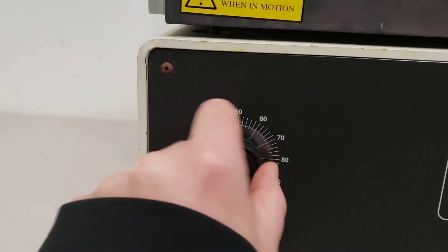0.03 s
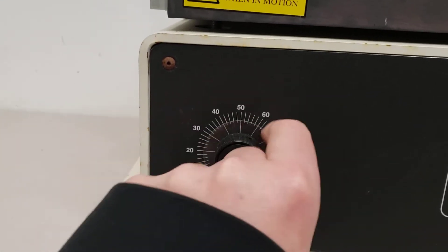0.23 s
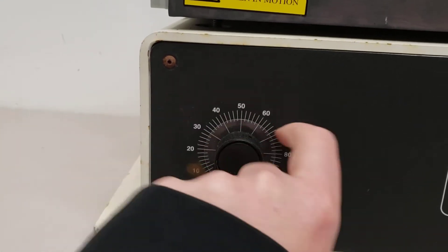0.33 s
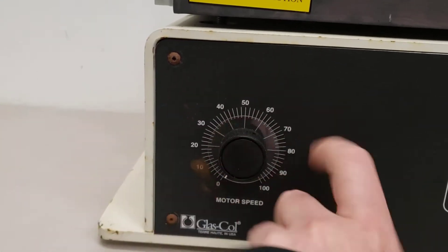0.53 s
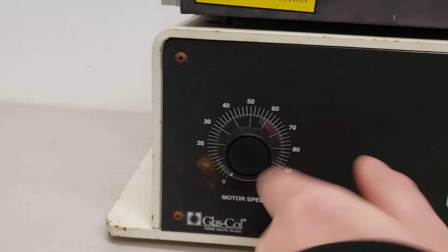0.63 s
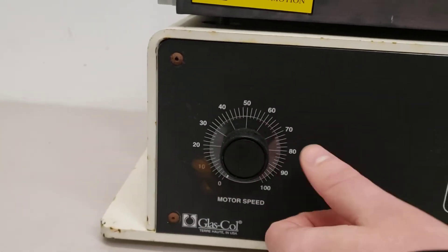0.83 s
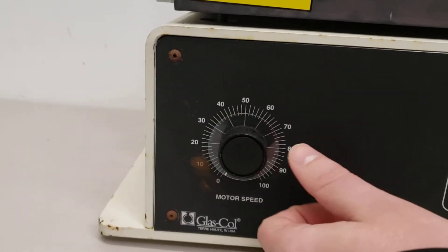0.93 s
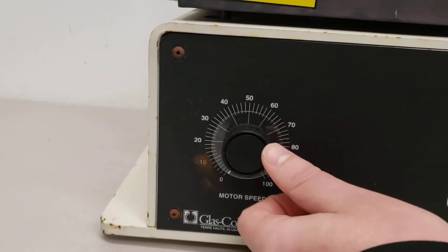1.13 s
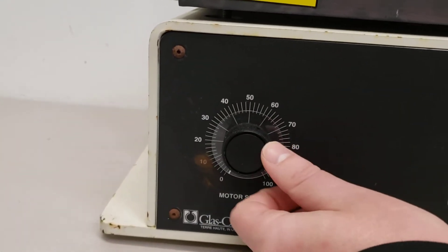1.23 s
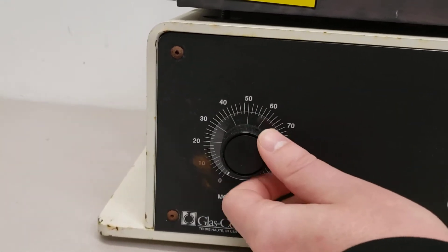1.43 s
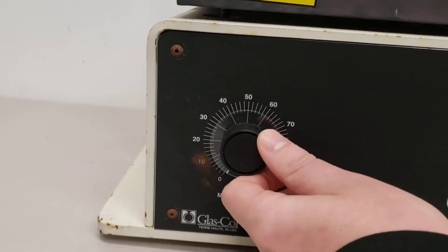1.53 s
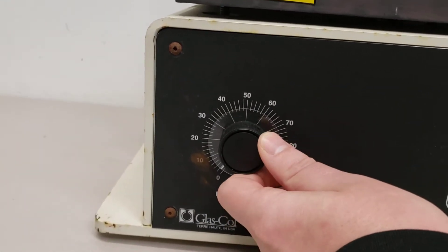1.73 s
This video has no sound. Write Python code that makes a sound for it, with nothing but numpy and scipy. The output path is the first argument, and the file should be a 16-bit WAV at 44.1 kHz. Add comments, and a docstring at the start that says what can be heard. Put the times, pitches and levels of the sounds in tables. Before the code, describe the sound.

A double thump rings and rattles a bench, just after a plastic knob ticks and a hand softly knocks a steel machine case. A sleeve swishes past and a faint whirr fades, close up in a quiet room.

```python
"""A knob ticks and a steel case booms softly: a hand lets go of the speed dial of a laboratory shaker,
close to the microphone in a quiet room. A double thump with a hard first contact rings the bench and
rattles what stands on it. Then a sleeve swishes by, cloth rubbing on cloth, and a narrow whirr fades
as the fingers settle on the dial again. Soft handling bumps and rumble lie underneath."""
import sys
import numpy as np
from scipy.fft import rfft, irfft, next_fast_len
from scipy.io import wavfile
from scipy.ndimage import map_coordinates

SR = 44100
rng = np.random.default_rng(int(sys.argv[2]) if len(sys.argv) > 2 else 0)


def materialize(psi):
    """Save the field psi as 16-bit PCM at rate SR to the path in sys.argv[1].

    A 1-D psi becomes a single channel; in a 2-D psi each row is a channel.
    """
    bounded = np.clip(np.atleast_2d(psi).T, -1, 1)
    quanta = np.round(bounded * 32767).astype(np.int16)
    wavfile.write(sys.argv[1], SR, quanta)


N = 79380

# blows on the bench, close by (time [s], level [dB], contact time [ms])
BLOWS = [(0.5774, -39, 0.1), (.592, -36, .85), (.6138, -44, .9)]
# modes of the bench under the shaker (frequency [Hz], level [dB], t60 [s])
BENCH_MODES = [(69.35, -13, 0.96), (98, 0.5, 0.16), (177.8, -3.5, 0.3), (236.3, -4.5, 0.31),
               (293.5, -2.5, 0.36), (361.4, -4, 0.28), (412.5, -2, .15), (554, 0, 0.19), (623, -1.5, 0.21),
               (719.8, -3.5, 0.24), (850, -4, 0.3), (978, -6.5, 0.22), (1198, 4, 0.09), (1262, 4.5, 0.075)]
# spectra of the dense clatter and of the hard first contact (frequency [Hz], level [dB])
CLATTER_COLOUR = [(60, -7), (1200, 1.5), (3000, -12.5), (15000, -39)]
CONTACT_COLOUR = [(300, -15), (1250, 2), (1700, -8), (2100, 0), (3000, -11), (4600, 2), (5500, -9),
                  (15000, -31)]
# where the thump sits at the microphone (frequency [Hz], left over right [dB])
THUMP_BALANCE = [(250, 2), (600, 0), (1300, 8.5), (4000, -3)]

def thump():
    """A hard blow, a softer, heavier one and its rebound ring the bench and rattle what stands on it."""
    out = amp(-36.5) * decay(BLOWS[0][0], t60=0.028) * noise(CONTACT_COLOUR) * pan(db=-2.0)
    for s, db, ms in BLOWS:
        clatter = filtered(noise(CLATTER_COLOUR), lambda hz: softness(hz, ms)) * decay(s, t60=0.18)
        bench = ring(BENCH_MODES, s, ms, spread=0.34, rough=0.42)
        out += amp(db) * (bench + amp(2.5) * clatter)
    return filtered(out, lambda hz: pan(along(THUMP_BALANCE, hz)))


# the hand on the case (time [s], level [dB], contact time [ms], ring time factor [ratio])
HAND_KNOCKS = [(.001, -59, 1.4, 0.79), (0.193, -42, 0.67, 1.02), (0.3463, -40, 1.14, 0.97),
               (1.301, -53.5, .3, 0.58), (1.388, -55, 1.7, 0.33)]
# modes of the steel case (frequency [Hz], level [dB], t60 before that factor [s])
CASE_MODES = [(63.5, -5.5, 0.74), (103.1, -11.5, 0.59), (220.7, 1, 0.4), (291.7, -7, 0.3),
              (388, -16.5, 0.19), (607, -14.5, .14), (731, -9, 0.092), (1240, -18, 0.06)]

def case():
    """The hand knocks the steel case as it leaves the dial and returns; resting fingers damp the ring."""
    out = np.zeros((2, N))
    for s, db, ms, factor in HAND_KNOCKS:
        modes = [(hz, mode_db, t60 * factor) for hz, mode_db, t60 in CASE_MODES]
        out += amp(db) * ring(modes, s, ms, spread=0.38, rough=0.46)
    return out


# ticks of the knob, right of the microphone (time [s], level [dB])
KNOB_TICKS = [(0.065, -42), (0.0657, -44.5), (.192, -37.5)]
# fingers scuffing off the dial (time [s], level [dB], rise [s], fall [s])
FINGER_SCUFFS = [(0.345, -56.5, 0.00067, 0.014), (.42, -50.5, 0.0045, 0.0079), (0.423, -59, 0.026, 0.041)]
# spectra of a tick and of a scuff at close range (frequency [Hz], level [dB])
PLASTIC_COLOUR = [(500, -16), (3900, -8), (4700, 11), (5700, -4), (8300, 2), (11200, -8.5), (13900, 11),
                  (15800, 0)]
FINGER_COLOUR = [(300, -12), (1400, -4), (2800, -12), (5200, -4), (6700, -17.5), (15000, -26.5)]
# resonances of the panel under a scuff (frequency [Hz], lift [dB])
PANEL_MODES = [(958, 15), (1440, 12), (2170, 13), (4080, 7), (5400, 12.5)]

def knob(width_hz=47):
    """Dry plastic ticks with a faint tail, and the fingers scuffing off, which rings the panel."""
    def panel(hz):
        return 1 + sum((amp(db) - 1) / (1 + (2 * (hz - centre) / width_hz) ** 2)
                       for centre, db in PANEL_MODES)
    tick_level = sum(amp(db) * (decay(s, t60=0.0096, attack=0.0001) + amp(-22.5) * decay(s, t60=0.17))
                     for s, db in KNOB_TICKS)
    ticks = tick_level * noise(PLASTIC_COLOUR) * pan(db=-12)
    scuffs = sum(swell(*row) for row in FINGER_SCUFFS) * unit(filtered(noise(FINGER_COLOUR), panel))
    return ticks + scuffs


# slow rubs of the sleeve, near the microphone (time [s], level [dB], rise [s], fall [s])
SLOW_RUBS = [(0.039, -60, 0.088, 0.038), (.39, -62, 0.03, 0.097), (0.663, -46, 0.073, 0.046),
             (1.16, -68, 0.2, .14), (1.46, -76.5, .06, 0.064), (1.78, -78, .04, .04)]
# spectra of the slow rubs and of the fast sweep (frequency [Hz], level [dB])
SLOW_COLOUR = [(200, -7), (2200, -12), (4600, -0.5), (7000, -8), (8200, -21.5), (11000, -14)]
FAST_COLOUR = [(100, -9), (330, 2), (550, -1.5), (950, 6.5), (1500, -1), (4900, 0), (7000, -5.5),
               (8200, -11.5), (11000, -7), (11900, -2.5), (13000, -6)]
# where the cloth sits at the microphone (frequency [Hz], left over right [dB])
CLOTH_BALANCE = [(200, -3.5), (1200, 7), (2400, 2.5), (4400, -11), (12000, -7.5), (15000, 1)]

def sleeve(peak_s=0.72, sweep_db=-42, rise_s=0.0839, fade_db_per_s=44):
    """Grainy cloth friction: dull in slow rubs, broad and bright in the fast sweep, which trails off."""
    sweep = swell(peak_s, sweep_db, rise_s, fall=0.1636)
    trail = swell(peak_s, sweep_db - 5.5, rise_s, fall=np.inf) * amp(-fade_db_per_s * since(peak_s))
    fast = np.hypot(sweep, trail) * noise(FAST_COLOUR)
    slow = sum(swell(*row) for row in SLOW_RUBS) * noise(SLOW_COLOUR)
    grain = amp(wobble(700) + 0.34 * wobble(50.3))
    return filtered((slow + fast) * grain, lambda hz: pan(along(CLOTH_BALANCE, hz)))


# soft bumps, mostly to the right (time [s], level [dB], pitch [Hz], left over right [dB])
LOW_BUMPS = [(.277, -34, 101, -24), (.344, -31.5, 206, 1.5), (0.847, -34.5, 85, -21), (1.095, -51, 78, -3)]
# swells of handling rumble (time [s], level [dB], rise [s], fall [s])
RUMBLE_SWELLS = [(.115, -59, 0.029, 0.026), (.24, -52, 0.035, 0.19), (.78, -51.5, 0.1, 0.1),
                 (1.25, -68.5, 0.18, 0.21), (1.775, -60.5, 0.033, 0.05)]
# spectrum of that rumble (frequency [Hz], level [dB])
HANDLING_COLOUR = [(20, -19), (45, -1.5), (115, -4), (450, -25.5), (1500, -50.5), (6000, -61)]

def bumps(rise_cycles=0.42):
    """Soft handling bumps of a cycle or two over a low rumble."""
    out = sum(swell(*row) for row in RUMBLE_SWELLS) * noise(HANDLING_COLOUR)
    for s, db, hz, side in LOW_BUMPS:
        cycles = hz * since(s)
        age = cycles / rise_cycles
        out -= amp(db) * pan(side) * age * np.exp(1 - age) * np.sin(2 * np.pi * cycles)
    return out


# surges of the whirr, just left of centre (time [s], level [dB], rise and fall [s])
WHIRR_SURGES = [(.97, -58, .055), (1.072, -56, .024), (1.174, -56.5, 0.041), (1.285, -65.5, .042)]
# its spectrum, peaking near 900 Hz (frequency [Hz], level [dB])
WHIRR_BAND = [(300, -41), (700, -20), (905, 8.5), (1050, -4.5), (1270, -8), (1550, -34), (2080, -10.5),
              (2600, -53)]

def whirr():
    """A narrow, fluttering whirr that comes in surges and outlasts the swish."""
    surges = np.sqrt(sum(swell(s, db, width, width) ** 2 for s, db, width in WHIRR_SURGES))
    flutter = amp(0.94 * wobble(40.85))
    return surges * flutter * noise(WHIRR_BAND) * pan(db=2.5)


# room tone at the bench (frequency [Hz], level [dB])
ROOM_COLOUR = [(55, 3.5), (150, -11), (350, -5.5), (470, -17), (1900, -18.5), (5400, -23), (8200, -34),
               (12000, -18.5)]

def room_tone():
    """The steady, low hush of the quiet room."""
    return amp(-68.5) * noise(ROOM_COLOUR)


# likeness of left and right at the microphone (frequency [Hz], correlation [ratio])
STEREO_LIKENESS = [(50, 0.23), (130, 0.97), (800, 0.61), (1400, 0.086)]

def noise(colour):
    """Coloured stereo noise of rms 1, nearly mono around 130 Hz."""
    def mid_side(hz):
        angle = np.arccos(np.clip(along(STEREO_LIKENESS, hz), -1, 1)) / 2
        return amp(along(colour, hz)) * [np.cos(angle), np.sin(angle)]
    mid, side = filtered(rng.standard_normal((2, N)), mid_side)
    return unit(np.array([mid + side, mid - side]))


def ring(modes, s, contact_ms, spread, rough):
    """Struck modes: rough unsettles the phase; spread parts left from right, more so for high modes."""
    out = np.zeros((2, N))
    for hz, db, t60 in modes:
        skew = spread * np.sqrt(hz / 500) * rng.normal() * np.array([[1], [-1]])
        drift = wobble(45.03)
        phase = 2 * np.pi * hz * since(s) + skew + rough * (drift - drift[int(s * SR)])
        level = amp(db + rng.normal()) * softness(hz, contact_ms)
        out += level * decay(s, t60, attack=0.0016) * np.sin(phase)
    return out


def softness(hz, contact_ms):
    """A longer contact excites fewer high modes."""
    return 1 / np.sqrt(1 + (hz * contact_ms / 500) ** 4)


def decay(s, t60, attack=0.00016):
    """A quick rise at s, then a fall of 60 dB in t60 seconds."""
    t = since(s)
    return (1 - np.exp(-t / attack)) * np.exp(-np.log(1000) * t / t60)


def swell(s, db, rise, fall):
    """A bell-shaped stroke that peaks at s."""
    t = since(0) - s
    return amp(db) * np.exp(-.5 * (t / np.where(t < 0, rise, fall)) ** 2)


def wobble(rate):
    """A smooth random curve, rate knots a second."""
    return map_coordinates(rng.standard_normal(4000), [since(0) * rate + 2], mode="wrap")


def filtered(x, response):
    """x shaped by a frequency response."""
    size = next_fast_len(N + 8192)
    return irfft(rfft(x, size) * response(np.fft.rfftfreq(size, 1 / SR)), size)[..., :N]


def pan(db):
    """Left and right gains of constant power; positive is left."""
    gains = amp(np.array([[.5], [-.5]]) * db)
    return gains / np.sqrt(np.mean(gains ** 2, axis=0))


def along(points, hz):
    """Interpolate (frequency, value) points on a log axis."""
    freqs, values = np.transpose(points)
    return np.interp(np.log(hz + 1), np.log(freqs + 1), values)


def since(s):
    """Seconds since s, zero before it."""
    return np.maximum(np.arange(N) / SR - s, 0)


def amp(db):
    """Decibels to gain."""
    return 10 ** (np.asarray(db) / 20)


def unit(x):
    """Scale to rms 1."""
    return x / np.sqrt(np.mean(x ** 2) + 1e-20)


def scene():
    """The shaker and the hand, close by, over the hush of the room."""
    return case() + knob() + thump() + bumps() + sleeve() + whirr() + room_tone()


def record(dry):
    """The close stereo microphone sheds the deepest bass and the very top of the treble."""
    low_cut_hz, top_hz = 38, 15950
    return filtered(dry, lambda hz: (hz < top_hz) * hz ** 3 / np.sqrt(hz ** 6 + low_cut_hz ** 6))


dry = scene()
out = record(dry)
materialize(out)
```